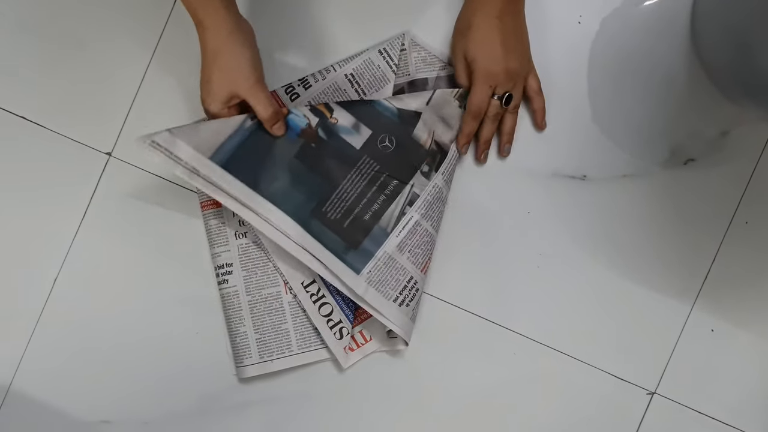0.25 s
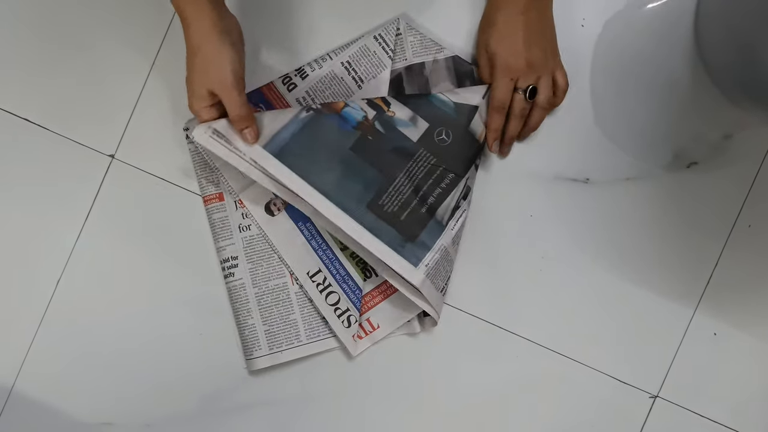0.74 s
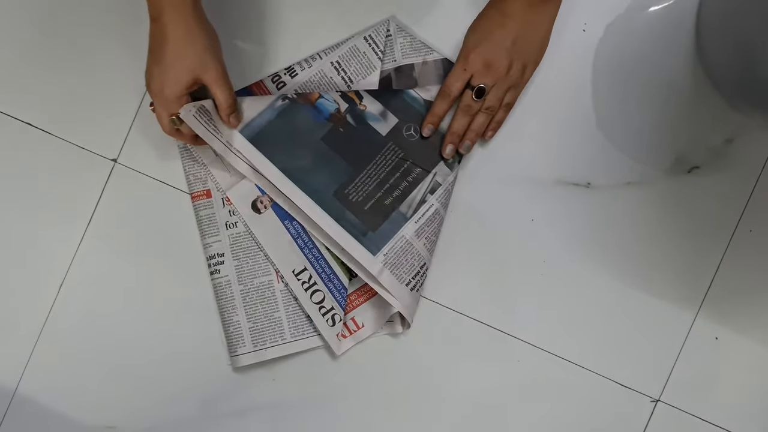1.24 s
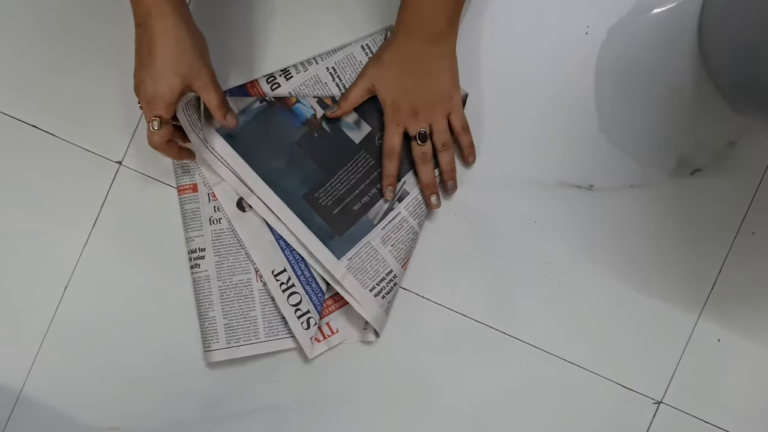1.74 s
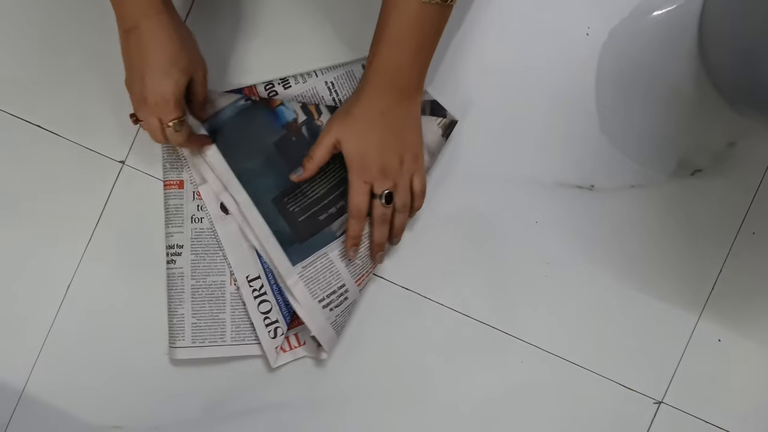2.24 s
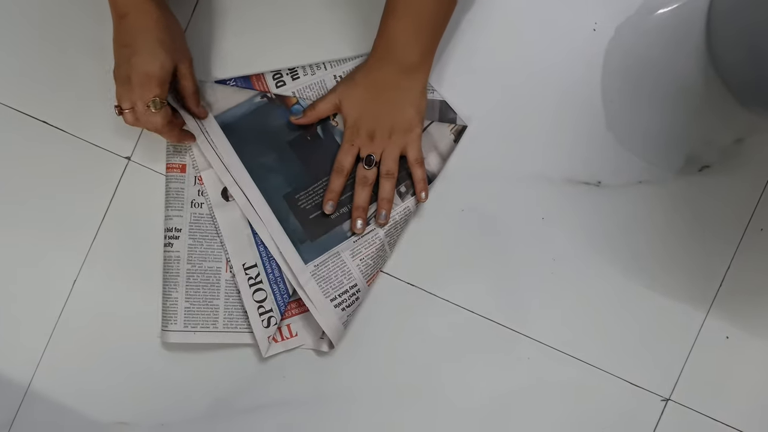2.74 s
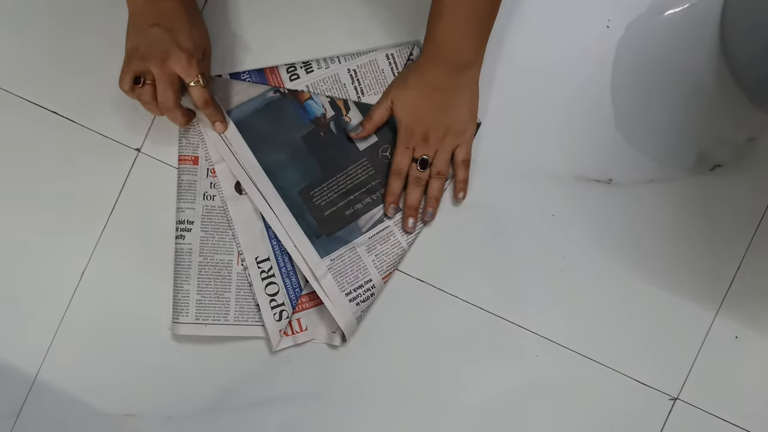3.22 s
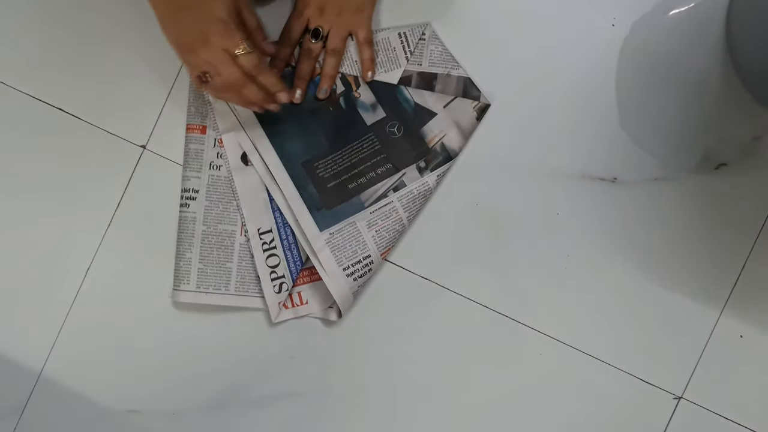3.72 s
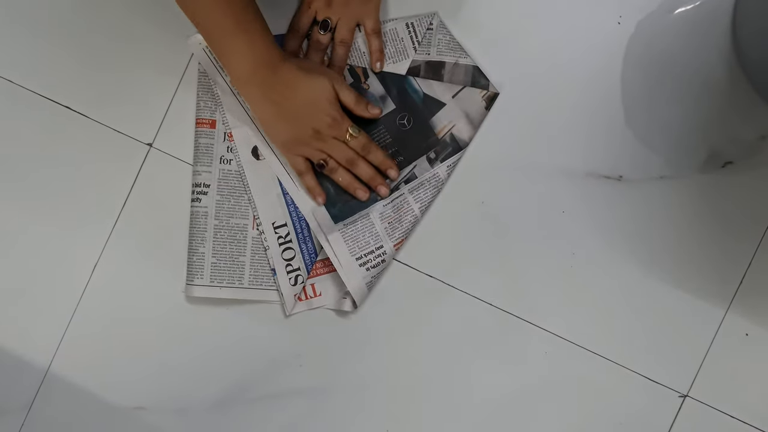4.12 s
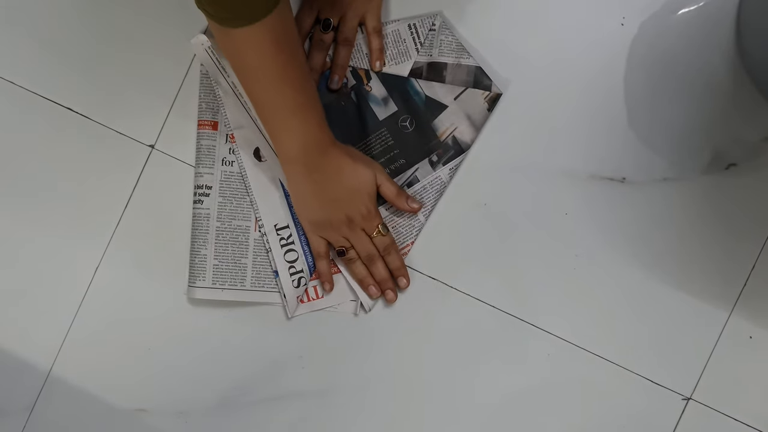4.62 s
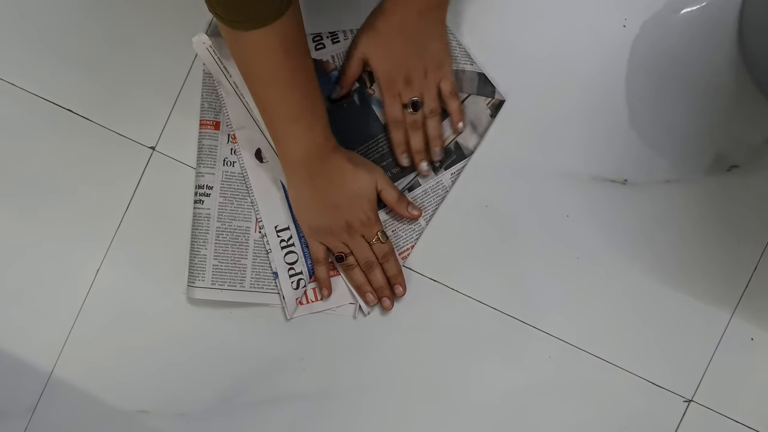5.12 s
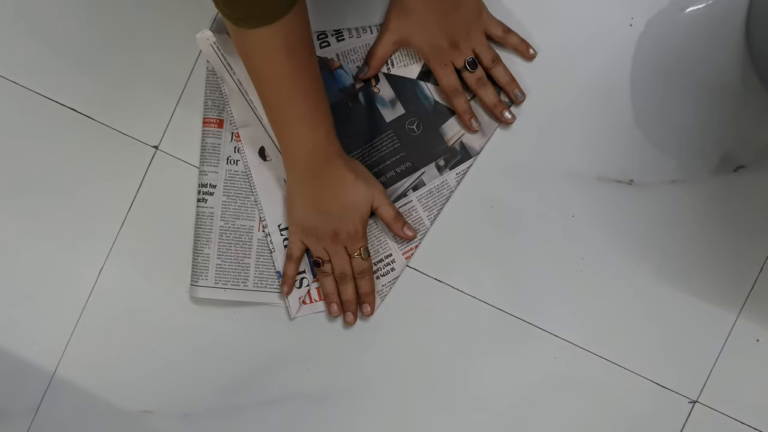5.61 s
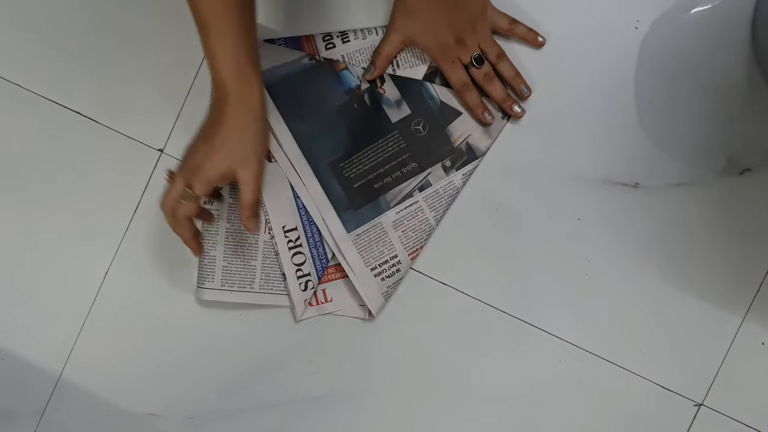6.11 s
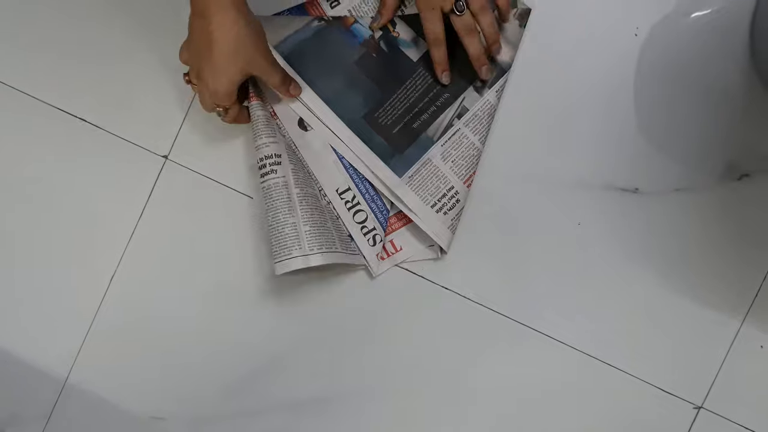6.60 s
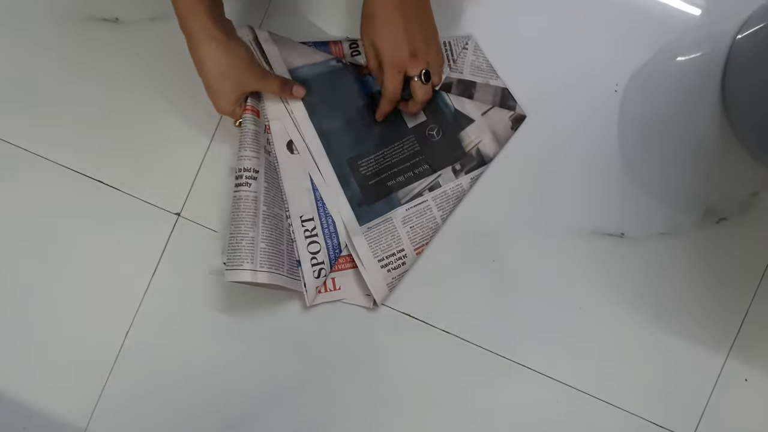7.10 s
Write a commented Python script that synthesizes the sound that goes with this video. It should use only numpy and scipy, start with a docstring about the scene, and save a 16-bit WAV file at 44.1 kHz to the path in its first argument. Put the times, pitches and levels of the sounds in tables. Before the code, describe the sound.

Hands fold and smooth newspaper on a tiled floor, heard close with a short, hard room echo. From the start to about 1.2 seconds the sheets rustle and crinkle in quick strokes, with the sharpest snap at about half a second. Lighter rustles and small ticks follow, then a cluster of crackling snaps near 2.8 seconds and more shifting. A very faint ting sounds at about 3.7 seconds. From 3.9 to 4.4 seconds a palm sweeps along the fold, making the loudest rub, full of little cracks. After a lull, two smoothing strokes come between 5.1 and 5.6 seconds. It goes quieter again until about 6.4 seconds, when crinkling and snaps return and continue to the end, just past 7 seconds. A faint wavering low hum, soft rumble and hiss run underneath throughout.

```python
"""Hands fold and smooth sheets of newspaper on a tiled floor, heard through two microphone ports.
Sliding palms shed a dense crackle of fibre slips; creases buckle with short snaps that ring the air
pocket under the sheet. The hard room rings after both. A wavering low hum, soft rumble and hiss
lie underneath; one faint struck tone sounds midway."""
import sys
import numpy as np
from scipy import signal
from scipy.io import wavfile
from scipy.ndimage import uniform_filter1d

SR = 44100
rng = np.random.default_rng(int(sys.argv[2]) if len(sys.argv) > 2 else 0)


def bounce(signal):
    """Save signal as a 16-bit WAV file at the path given by the first command-line argument."""
    frames = np.transpose(np.atleast_2d(signal))
    limited = np.clip(frames, -1, 1)
    pcm = np.round(limited * 32767).astype(np.int16)
    wavfile.write(sys.argv[1], SR, pcm)


N = 324135
LAG_SAMPLES = 7  # the left port hears the paper late


def gain_of(db):
    """Decibels to gain."""
    return 10 ** (np.asarray(db) / 20)


def unit_rms(x):
    """Scale to rms 1."""
    return x / np.sqrt(np.mean(x ** 2) + 1e-20)


def at_hz(points, hz):
    """Interpolate a spectrum over log frequency."""
    point_hz, value = np.transpose(points)
    return np.interp(np.log(hz + 1), np.log(point_hz + 1), value)


def at_time(points, t):
    """Interpolate a curve over time."""
    return np.interp(t, *np.transpose(points))


def add(mix, start_s, sound):
    """Mix a sound in at start_s."""
    part = mix[round(start_s * SR):][:len(sound)]
    part += sound[:len(part)]


def diffuse(a, b, hz):
    """Diffuse field at two ports: alike in the bass, nearly unrelated in the treble."""
    # likeness of the ports: freq_hz, correlation
    coherence = [(200, 0.9), (400, 0.85), (750, 0.23), (1300, 0.07)]
    same = np.clip(at_hz(coherence, hz), -1, 1)[:, None]
    return np.array([a, same * a + np.sqrt(1 - same ** 2) * b])


def hand_pressure():
    """Strokes sum in power to a pressure; the loudest sets how much the loose sheet booms."""
    # hand shifts, presses and slides: start_s, hold_s, pressure_db, fade_db_per_s, boom_db
    strokes = [(0.108, 0.1, -38, 165, 0.5), (0.274, 0.092, -47, 114, -1), (0.455, 0.083, -38.5, 140, 5.5),
               (0.55, 0.014, -39.5, 92, -2), (0.647, 0.033, -39, 73, 1.5), (0.866, 0.0099, -45.5, 142, 4.5),
               (0.927, 0.069, -37.5, 183, 2.5), (1.09, 0.023, -43, 120, -5.5), (1.221, 0.077, -48, 127, 2),
               (1.655, 0.12, -48.5, 123, 2.5), (1.855, 0.0093, -44.5, 130, 0.5),
               (2.148, 0.089, -49.5, 118, -5.5), (2.275, 0.12, -46.5, 70, 4), (2.795, 0.012, -37, 99, 2.5),
               (2.872, 0.034, -41, 144, 5), (3.013, 0.14, -42, 180, -3.5), (3.257, 0.057, -44, 74, -3),
               (3.364, 0.033, -44.5, 88, 0), (3.496, 0.029, -41.5, 180, -7), (3.621, 0.015, -48.5, 100, -3),
               (3.867, 0.2, -43.5, 156, 3), (4.112, 0.02, -30.5, 138, -22), (4.181, 0.034, -31, 61.5, -13),
               (4.654, 0.016, -53.5, 110, -16), (4.832, 0.044, -57, 174, -5),
               (5.074, 0.11, -36.5, 103, -5.5), (5.36, 0.013, -37.5, 111, -31),
               (5.483, 0.056, -41, 225, -53), (5.936, 0.024, -55.5, 85, -5.5),
               (6.215, 0.15, -51.5, 85, -44), (6.458, 0.11, -42, 113, -11), (6.508, 0.045, -42, 120, 3),
               (6.61, 0.021, -37.5, 95, -0.5), (6.763, 0.013, -31.5, 159, 2.5), (6.89, 0.078, -44, 170, -2),
               (7.106, 0.042, -46, 68, 0.5), (7.304, 0.056, -40.5, 114, 1)]
    # fingers resting on the pile: time_s, pressure_db
    resting = [(0.0, -42), (0.4, -82), (1.55, -51.5), (2.7, -51), (3.5, -56.5), (3.8, -86), (5.0, -76),
               (5.75, -64), (5.9, -80), (6.1, -59.5), (7.07, -56.5), (7.3, -48)]
    min_rise_s, flatten_db_per_s, resting_boom_db = 0.0014, 18.5, 1
    t = np.arange(0, N / SR + .002, .001)
    start_s, hold_s, top_db, fade_db_per_s, boom_db = np.transpose(strokes)[:, :, None]
    age_s = t - start_s
    rise = np.clip(age_s / (min_rise_s + 0.38 * hold_s), 0, 1)  # long strokes start gently
    fading_s = np.maximum(age_s - min_rise_s - hold_s, 0)
    power = (rise * gain_of(top_db - fade_db_per_s * fading_s)) ** 2
    resting_power = gain_of(at_time(resting, t)) ** 2
    total = power.sum(0) + resting_power
    boom_db = boom_db - flatten_db_per_s * age_s  # a stroke presses the sheet flat
    boom_db = ((power * boom_db).sum(0) + resting_power * resting_boom_db) / total
    return t, 10 * np.log10(total), boom_db - boom_db.mean()


def crackle():
    """Thousands of fibre slips a second, in clumps; each rings patches of sheet for a few cycles."""
    # crackle colour: freq_hz, level_db
    sheet = [(300, -14.5), (600, -36.5), (850, -16.5), (1400, -14.5), (2300, -9.5), (6500, -15),
             (9300, -18), (15500, -16.5)]
    # crackle treble: time_s, level_db
    treble = [(0.0, -12.5), (2.2, -1.5), (4.3, -6.5), (4.85, -1.5), (7.35, -14)]
    slips_per_s = 7000
    t = np.arange(N) / SR
    hand_s, pressure_db, boom_db = hand_pressure()
    clump_db = 2.0 * unit_rms(uniform_filter1d(rng.standard_normal(N), 500))
    size_db = 3.9 * np.minimum(rng.exponential(1, N), 4.2)
    slips = rng.choice([-1., 1.], N) * gain_of(size_db) * (rng.random(N) < slips_per_s / SR)
    pocket_hz = 1400 * gain_of(-.45 * boom_db)  # a flat sheet traps less air and rings higher
    # firm pressure adds body rather than fizz
    fizz_db = at_time(treble, hand_s) - 0.21 * (pressure_db - np.median(pressure_db))
    out = fold_channel(slips)
    for hz in np.geomspace(350, 15000, 24):
        stirs = slips * (rng.random(N) < np.clip(hz / 15000, .04, .4))  # large low patches stir seldom
        cycles = np.arange(round(6 * SR / hz)) * hz / SR
        grain = cycles * np.exp(-cycles / .6) * np.sin(2 * np.pi * cycles)
        boom_weight = np.clip(np.log(1700 / hz) / 0.5, 0, 1.4)
        fizz_weight = np.clip(np.log(hz / 6000), 0, 1)
        level_db = at_hz(sheet, hz) + 10 * np.log10(hz / 3000)
        level_db += boom_weight * boom_db + fizz_weight * fizz_db
        level_db += 3.15 * np.exp(-(np.log(hz / pocket_hz) / 0.21) ** 2)
        level_db += 3 * unit_rms(uniform_filter1d(rng.standard_normal(len(hand_s)), 14))  # in fits
        patch = np.interp(t, hand_s, gain_of(level_db)) * unit_rms(signal.oaconvolve(stirs, grain)[:N])
        out += [np.roll(patch, LAG_SAMPLES + rng.integers(-6, 8)), patch]  # each patch lies elsewhere
    return gain_of(np.interp(t, hand_s, pressure_db) + clump_db) * out


def background():
    """Steady rumble and hiss, wavering hum bands whose lowest swells, and a steady mains tone."""
    # rumble and hiss spectrum: freq_hz, relative_density_db
    air_spectrum = [(18, 16.5), (30, -39), (140, -6), (299, 0.5), (443, -15.5), (1020, -25), (2420, -25),
                    (9500, -35), (15500, -42)]
    # hum bands: centre_hz, width_hz, relative_db
    hum_bands = [(47.8, 3, 0), (97.4, 39, 8.5), (229, 7.4, -6.5)]
    # lowest hum tone: time_s, level_db
    hum_swell = [(0.0, -54), (0.9, -70), (2.05, -72), (2.33, -58), (3.38, -50), (4.3, -68), (4.55, -51),
                 (5.44, -57), (5.7, -72), (6.0, -47.5), (7.0, -50), (7.2, -70)]
    air_db, upper_hum_db, mains_hz, mains_db = -48, -56, 200.3, -62.5
    t, hz = np.arange(N) / SR, np.fft.rfftfreq(8192, 1 / SR)
    a, b, c, d = rng.standard_normal((N // 2048 + 5, len(hz), 4)).T
    spectra = diffuse(a + 1j * b, c + 1j * d, hz)

    def noise(gain):
        return unit_rms(signal.istft(spectra * gain[:, None], nperseg=8192, noverlap=6144)[1][:, :N])

    bands = [gain_of(db) / np.sqrt(width_hz) / (1 + (2 * (hz - centre_hz) / width_hz) ** 2)
             for centre_hz, width_hz, db in hum_bands]
    air = gain_of(air_db) * noise(gain_of(at_hz(air_spectrum, hz)))
    low_tone = np.sqrt(2) * np.sin(2 * np.pi * hum_bands[0][0] * t)
    low_hum = gain_of(at_time(hum_swell, t)) * (low_tone + 0.17 * noise(bands[0]))
    upper_hum = gain_of(upper_hum_db) * noise(sum(bands[1:]))
    mains = gain_of(mains_db) * np.sqrt(2) * np.sin(2 * np.pi * mains_hz * t)
    return air + low_hum + upper_hum + mains


def room(paper):
    """Sparse reflections die band by band; three tails crossfade steadily so no fixed pitch rings."""
    # room decay: freq_hz, t60_s
    decay = [(500, 0.29), (3000, 0.28), (15000, 0.19)]
    crossfade_hz = 4
    t, out = np.arange(N) / SR, np.zeros((2, N))
    for k in range(3):
        taps = np.zeros((2, SR))
        delays = np.arange(200, SR - 20, 20) + rng.integers(0, 20, (2, (SR - 201) // 20))
        np.put_along_axis(taps, delays, rng.choice([-1., 1.], delays.shape), 1)
        hz, age_s, spectra = signal.stft(taps, SR, nperseg=256)
        spectra = diffuse(*spectra, hz) * gain_of(-60 * age_s / at_hz(decay, hz)[:, None])
        tail = signal.istft(spectra, SR, nperseg=256)[1]
        tail /= np.linalg.norm(tail[0])
        crossfade = np.sqrt(2 / 3) * np.cos(2 * np.pi * (crossfade_hz * t + k / 3))
        out += signal.fftconvolve((paper * crossfade)[None], tail, axes=1)[:, :N]
    return out


def snaps():
    """A crease buckles: a short broad crack, while the air pocket under the sheet rings unevenly."""
    # buckling creases: start_s, level_db, pocket_hz, crack_re_pocket_db
    creases = [(0.133, -29, 670, 3), (0.191, -12.5, 2300, -16), (0.376, -29, 780, -25),
               (0.473, -25, 1010, -13), (0.535, -2.5, 2840, -14.5), (0.672, -20.5, 1130, -13.5),
               (0.875, -21, 1250, -36), (0.934, -25.5, 1000, -29), (0.966, -22.5, 1310, -3),
               (1.529, -27.5, 1010, -19), (1.673, -25, 890, -27), (1.737, -30.5, 1210, -12),
               (2.093, -26, 2300, -13), (2.349, -22, 1020, -31), (2.604, -26.5, 1210, -20),
               (2.794, -14.5, 850, -13), (2.801, -14.5, 940, -2.5), (2.877, -22, 1010, -30),
               (2.884, -18, 1070, -36), (2.895, -12, 1344, -33), (3.491, -19, 900, -6.5),
               (3.625, -27, 4130, 0), (3.9, -34, 1200, -10), (3.917, -24, 1270, -41),
               (4.042, -22.5, 1290, -30), (4.054, -29.5, 1260, -33), (4.117, -21, 1970, -25),
               (4.18, -12.5, 1460, -3), (4.201, -20, 1360, 2.5), (4.221, -15, 7540, -22),
               (4.223, -20.5, 1450, 1.5), (4.323, -18, 1960, -11), (4.377, -19, 2050, -7),
               (4.686, -33, 2670, -21), (5.09, -24, 1310, -39), (5.233, -24, 1900, 0),
               (5.373, -14.5, 3700, -12.5), (5.938, -27, 2170, -33), (6.112, -40, 1420, -15),
               (6.267, -37, 4300, -1), (6.46, -24, 3400, -19), (6.553, -25.5, 2530, -2.5),
               (6.618, -21.5, 2110, -3.5), (6.77, -22, 1050, -32), (6.774, -13.5, 3400, -9.5),
               (7.294, -25, 915, -25), (7.295, -16, 2520, -4.5)]
    rise_s, ring_at_1khz_s, crack_decay_s = 0.00063, .0023, 0.0018
    t, out = np.arange(700) / SR, np.zeros((2, N))
    crack_band = signal.butter(2, [1600., 9500.], "bandpass", fs=SR, output="sos")
    for start_s, level_db, pocket_hz, crack_db in creases:
        noise = rng.standard_normal((3, len(t)))
        wander = .45 * unit_rms(uniform_filter1d(noise[2], size=6))  # the pocket changes shape
        envelope = np.minimum(t / rise_s, 1) * np.exp(-(t / ring_at_1khz_s) ** 2 * pocket_hz / 1000)
        pocket = envelope * np.sin(2 * np.pi * pocket_hz * np.cumsum(1 + wander) / SR)
        burst = unit_rms(signal.sosfilt(crack_band, noise[:2]))  # each port faces another side
        crack = gain_of(crack_db) * np.exp(-t / crack_decay_s) * burst
        left, right = gain_of(level_db) * (pocket + crack)
        add(out[0], start_s + LAG_SAMPLES / SR, left)
        add(out[1], start_s, right)
    return signal.sosfilt(signal.butter(3, 620., "highpass", fs=SR, output="sos"), out)


def ting():
    """A small struck thing rings faintly in one mode."""
    start_s, level_db, pitch_hz, t60_s = 3.69, -54, 950, .6
    t, out = np.arange(SR // 2) / SR, np.zeros(N)
    add(out, start_s, gain_of(level_db - 60 * t / t60_s) * np.sin(2 * np.pi * pitch_hz * t))
    return out


def fold_channel(slips):
    """A palm sweeps along the fold; the slips ring its air channel."""
    start_s, end_s, pitch_hz, decay_cycles, relative_db = 3.93, 4.29, 1350, 2.2, -8
    t, cycles = np.arange(N) / SR, np.arange(1024) * pitch_hz / SR
    ring = cycles * np.exp(-cycles / decay_cycles) * np.sin(2 * np.pi * cycles)
    fold = unit_rms(signal.oaconvolve(slips, ring)[:N])
    fold *= gain_of(relative_db) * (t > start_s) * (t < end_s)
    return np.array([np.roll(fold, LAG_SAMPLES), fold])


def scene():
    """Paper, direct and through the room, over the background."""
    rub, snap = crackle(), snaps()
    reflected = room(gain_of(-2) * rub[1] + gain_of(-5) * snap[1])
    return rub + snap + reflected + ting() + background()


def record(dry):
    """Two ports of unequal colour; the deepest bass and the top treble are cut."""
    # port imbalance: freq_hz, left_minus_right_db
    imbalance = [(1300, .2), (2400, 1.2), (5000, 2.5), (9000, -3.5), (15000, -2.2)]
    low_cut_hz, high_cut_hz = 39, 15850
    hz = np.linspace(0, SR / 2, 257)
    tilts = [signal.firwin2(255, hz, gain_of(side * at_hz(imbalance, hz)), fs=SR, window="hann")
             for side in (.5, -.5)]
    ported = signal.oaconvolve(dry, np.array(tilts), "same", axes=1)
    ported = signal.sosfilt(signal.butter(6, low_cut_hz, "highpass", fs=SR, output="sos"), ported)
    lowpass = signal.firwin(511, high_cut_hz, window=("kaiser", 9), fs=SR)
    return signal.oaconvolve(ported, lowpass[None], "same")


dry = scene()
out = record(dry)
bounce(out)
```